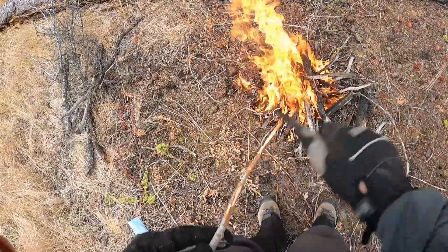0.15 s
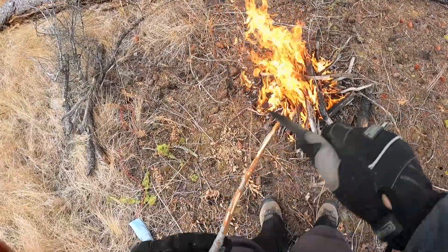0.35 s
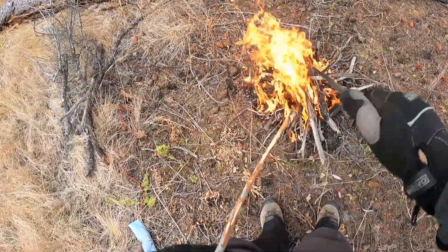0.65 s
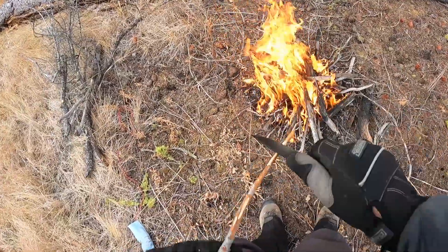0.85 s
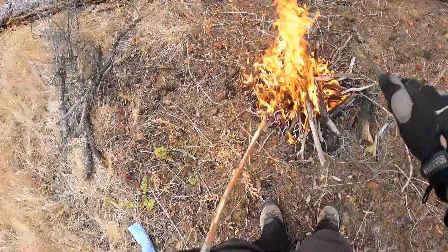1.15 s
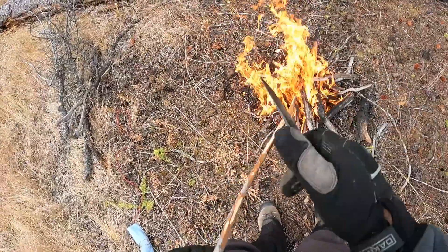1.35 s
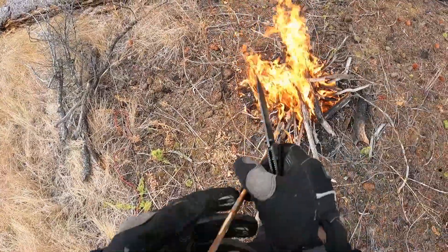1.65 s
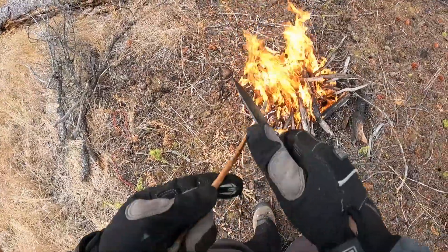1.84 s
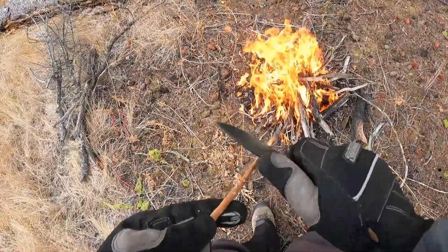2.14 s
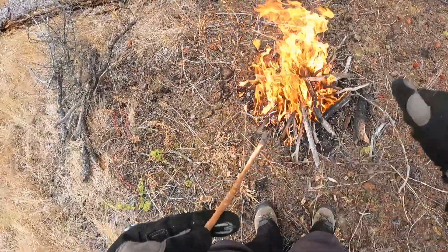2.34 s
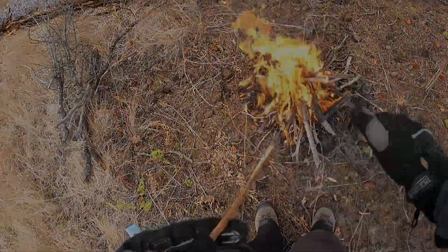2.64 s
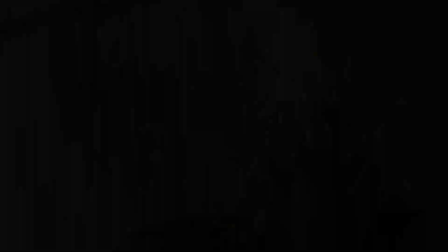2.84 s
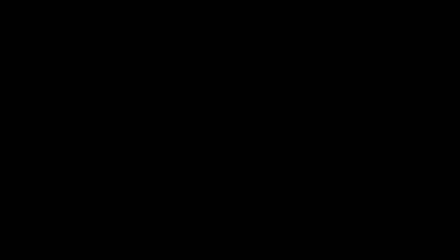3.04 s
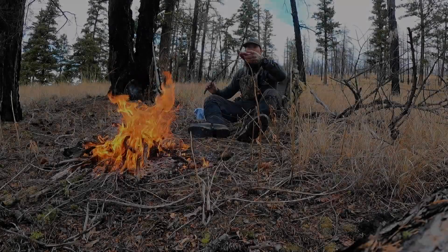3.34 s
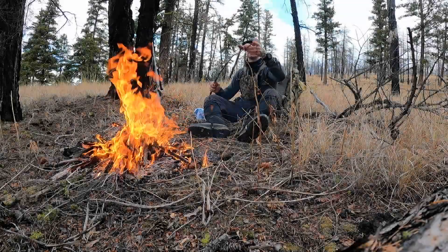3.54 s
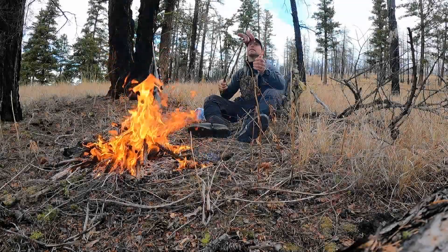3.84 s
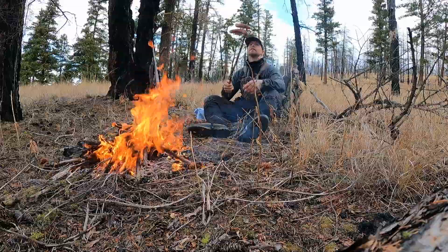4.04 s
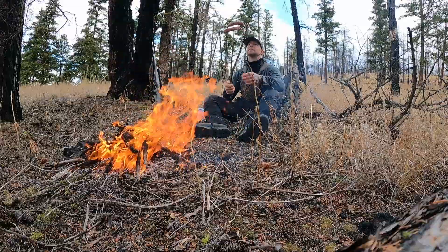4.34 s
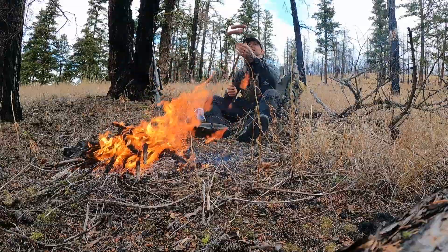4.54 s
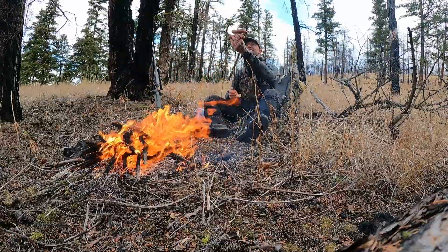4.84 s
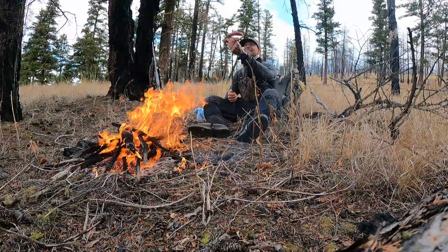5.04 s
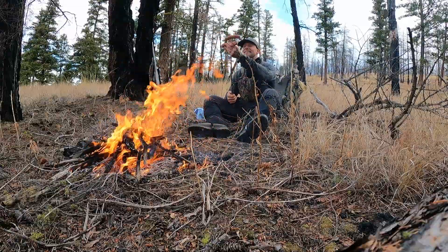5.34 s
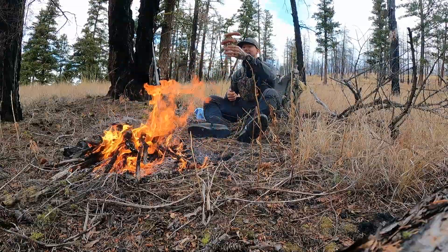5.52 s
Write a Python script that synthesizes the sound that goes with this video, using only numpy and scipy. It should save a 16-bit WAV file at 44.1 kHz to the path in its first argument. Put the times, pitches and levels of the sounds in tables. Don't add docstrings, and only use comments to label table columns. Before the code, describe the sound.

Outdoors, a small fire of dry twigs burns close below a small camera microphone. Sharp pops and bright snaps come many times a second, with short spurts of steamy sizzle and a deep uneven flame rumble. Around three seconds the view moves back: sizzle fades, pops become fewer and softer, and a low breeze rises near the end.

```python
import sys
import numpy as np
from scipy import signal
from scipy.fft import rfft, irfft, next_fast_len
from scipy.io import wavfile
from scipy.ndimage import uniform_filter1d

SR = 44100
rng = np.random.default_rng(int(sys.argv[2]) if len(sys.argv) > 2 else 0)


def digitize_waveform(pressure):
    field = np.atleast_2d(pressure).T
    bounded = np.clip(field, -1, 1)
    quanta = np.round(bounded * 32767).astype(np.int16)
    wavfile.write(sys.argv[1], SR, quanta)


def voltage_ratio(level):
    return 10 ** (np.asarray(level, float) / 20)


N = 250488


def resonances(hz, modes):
    total = 0
    for k, (mode_hz, width_hz, db) in enumerate(modes):
        damping = 1j * hz * width_hz
        total = total + (-1) ** k * voltage_ratio(db) * damping / (mode_hz ** 2 - hz ** 2 + damping)
    return total


def ring(x, modes):
    size = next_fast_len(len(x))
    hz = np.arange(size // 2 + 1) * SR / size
    y = irfft(rfft(x, size) * resonances(hz, modes), size)[:len(x)]
    return y / np.sqrt(np.mean(y ** 2))


def colour(x, points):
    size = next_fast_len(len(x))
    bins_hz = np.arange(size // 2 + 1) * SR / size
    hz, db = np.transpose(points)
    gain = voltage_ratio(np.interp(np.log(bins_hz + 1), np.log(hz), db))
    return irfft(rfft(x, size) * gain, size)[:len(x)]


def curves(table):
    seconds, *columns = np.transpose(table)
    return [np.interp(np.arange(N) / SR, seconds, column) for column in columns]


def walk(rate_hz):
    hold = int(SR / rate_hz)
    steps = np.repeat(rng.standard_normal(N // hold + 1), hold)
    return 1.56 * uniform_filter1d(uniform_filter1d(steps, hold), hold)[:N]


# frequency in Hz, level in dB.
AIR_TILT = [(300, 19), (700, -7.5), (1500, -9), (3000, -63), (6000, -9), (12000, -62), (16000, -38)]


def air():
    hush = colour(rng.standard_normal(N), [(100, -25), *AIR_TILT])
    return voltage_ratio(-63.5) * hush / hush.std()


# time in seconds, level in dB.
BREEZE_LEVEL = [
    (0, -94),
    (4.2, -97),
    (4.7, -66.5),
    (5.2, -55),
    (5.68, -53.5),
]


def breeze():
    level_db, = curves(BREEZE_LEVEL)
    gusts = level_db + 3.6 * walk(6)
    return voltage_ratio(gusts) * ring(rng.standard_normal(N), [(40, 24, 0)])


# time in seconds, rumble in dB, flutter in dB.
FLAME_LEVELS = [(0.0, -50.5, -43.5), (0.25, -41, -40.5), (0.33, -42, -46.5), (0.4, -29, -40.5),
                (0.44, -37.5, -43), (0.74, -39, -41), (0.79, -25.5, -39), (0.84, -36, -45), (0.9, -43, -32),
                (0.96, -32.5, -42), (1.03, -45, -39.5), (1.11, -26.5, -32.5), (1.14, -38.5, -36),
                (1.41, -44.5, -42.5), (1.9, -45, -42.5), (1.94, -39.5, -42.5), (2.06, -39.5, -44),
                (2.09, -33, -37.5), (2.18, -44, -54), (2.23, -46, -27), (2.31, -30, -44.5),
                (2.42, -43, -43), (2.59, -40, -47.5), (2.64, -39.5, -35.5), (2.7, -34, -47),
                (2.83, -57, -52), (2.93, -37.5, -36), (2.97, -41, -46), (3.26, -43, -47.5),
                (3.34, -41.5, -50), (3.39, -36, -42.5), (3.42, -40, -49.5), (3.54, -41.5, -44),
                (3.78, -46.5, -48.5), (3.81, -59, -39.5), (3.84, -44, -55.5), (3.99, -38, -46),
                (4.02, -43, -46.5), (4.14, -37, -52), (4.18, -29.5, -46.5), (4.29, -40.5, -56),
                (4.37, -41.5, -44.5), (4.78, -40.5, -52), (4.82, -35, -44), (4.97, -41.5, -42.5),
                (5.13, -31.5, -44), (5.14, -35, -44), (5.51, -37.5, -44), (5.54, -45, -45),
                (5.58, -27, -51), (5.68, -55, -46)]


def flame():
    rumble_db, flutter_db = curves(FLAME_LEVELS)
    rumble = ring(rng.standard_normal(N), [(33.5, 41.5, 2), (81, 82.7, -2)])
    puffs = ring(rng.standard_normal(N), [(231, 1170, 0)])
    flutter = ring(puffs, [(157, 86, 0.5), (345, 168, -4.5)])
    return voltage_ratio(rumble_db + 1) * rumble + voltage_ratio(flutter_db - 1.5 + 2.6 * walk(40)) * flutter


# frequency in Hz, width in Hz, level in dB.
HOUSING_MODES = [(1234, 346, -1), (1990, 416, -1.5), (2500, 395, -2), (3750, 800, 2), (4910, 2960, -4),
                 (6415, 2200, -3)]
# frequency in Hz, width in Hz, level in dB.
FIZZ_MODES = [(8060, 4500, -22.5), (10300, 780, 13.5), (13400, 1400, -23.5)]
# time in seconds, level in dB, fizz in dB.
SIZZLE_LEVELS = [(0.0, -44.5, -71), (0.14, -49, -68), (0.27, -47.5, -68), (0.38, -45.5, -53.5),
                 (0.74, -43, -49), (1.27, -47.5, -63), (1.44, -43.5, -58), (1.63, -43.5, -60),
                 (1.99, -45, -57), (2.53, -44.5, -59), (2.69, -46.5, -60), (2.94, -63, -71),
                 (3.11, -52, -57), (3.31, -55, -58), (3.57, -63, -78), (3.76, -62.5, -56.5),
                 (3.95, -67, -70), (4.21, -72.5, -75), (4.32, -60, -72), (4.81, -70, -86),
                 (5.54, -66.5, -83), (5.68, -67, -71)]
# start in seconds, length in seconds, level in dB,
# woody body minus level in dB, fizz minus level in dB.
STEAM_SPURTS = [(0.05, 0.035, -46.5, 4.5, -26), (0.177, 0.09, -24.5, -13, -41), (0.32, 0.017, -43, -9, -20),
                (0.369, 0.024, -31.5, -19.5, -32), (0.48, 0.036, -26, -12, -9),
                (0.563, 0.067, -31, -7.5, -34), (0.65, 0.0073, -48, -3, -15),
                (0.704, 0.01, -40.5, -0.5, -12), (0.872, 0.032, -34, -18, -25),
                (1.054, 0.075, -29, -12, -29), (1.164, 0.023, -30, -14, -30), (1.322, 0.02, -38.5, -7, -10),
                (1.41, 0.054, -31, -19, -22), (1.493, 0.026, -33, -19, -10), (1.617, 0.02, -35, -9, -20),
                (1.684, 0.02, -33, -12, -13), (1.758, 0.042, -34, -15, -18), (1.846, 0.0082, -28, -6, -18),
                (1.842, 0.044, -33.5, -11, -24), (1.961, 0.024, -31.5, -7, -13),
                (2.094, 0.032, -43, -20, -8), (2.149, 0.011, -43, -2, -3), (2.205, 0.07, -29, -7, -28),
                (2.354, 0.025, -42, -7, -11), (2.41, 0.023, -47, -4, -16), (2.462, 0.018, -29.5, -11, -18),
                (2.592, 0.061, -31, -18, -23), (2.785, 0.033, -55, 6, -18), (2.866, 0.1, -29, -2, -35),
                (2.993, 0.039, -41, -3, -17), (3.067, 0.029, -35.5, -10, -17),
                (3.178, 0.034, -38.5, 3.5, -26), (3.228, 0.056, -44, -2, -8), (3.306, 0.038, -53, -7, -10),
                (3.362, 0.025, -37, -6, -8), (3.531, 0.049, -38.5, -6, -2), (3.605, 0.071, -44, -6, -2),
                (3.707, 0.07, -49, -1, -11), (3.809, 0.048, -47.5, -3, -4), (3.888, 0.071, -44, -6, -11),
                (4.162, 0.086, -43, -2.5, -12), (4.447, 0.068, -49, 4, -16), (4.558, 0.053, -50, 7, -19),
                (4.722, 0.059, -46.5, 6, -2), (4.81, 0.087, -46, -1, -8), (5.07, 0.06, -56, 15, -10),
                (5.184, 0.025, -56, 11, -3), (5.598, 0.038, -55, 5, -1)]


def sizzle():
    level_db, fizz_db = curves(SIZZLE_LEVELS)
    mid, body, fizz = voltage_ratio(level_db - 1.0), voltage_ratio(level_db - 9), voltage_ratio(fizz_db - 16.5)
    t = np.arange(N) / SR
    for start, length, spurt_db, body_db, spurt_fizz_db in STEAM_SPURTS:
        near = slice(max(int((start - length) * SR), 0), int((start + 2 * length) * SR))
        from_middle = np.abs(2 * (t[near] - start) / length - 1)
        swell = voltage_ratio(spurt_db - 6.5) * np.exp(-from_middle ** 2.2)
        mid[near] += swell
        body[near] += voltage_ratio(body_db) * swell
        fizz[near] += voltage_ratio(spurt_fizz_db) * swell

    size_db = 3.0 * np.minimum(rng.exponential(size=N), 5)
    cracking = rng.random(N) < 0.04
    cracks = cracking * rng.standard_normal(N) * voltage_ratio(size_db)
    hiss = 0.75 * rng.standard_normal(N)
    steam = (cracks / cracks.std() + hiss) * voltage_ratio(4.13 * walk(110))
    woody = ring(steam, [(365, 89, -5), (830, 220, -9.5)])
    return mid * ring(steam, HOUSING_MODES) + fizz * ring(steam, FIZZ_MODES) + body * woody


# time in seconds, crack peak in dB, crack pitch in Hz,
# thud minus crack in dB, fizz minus crack in dB.
WOOD_POPS = [(0.0085, -14.5, 4610, -25, -10), (0.0377, -25, 2930, -17, -32), (0.0534, -27, 4050, -19, -22),
             (0.1422, -28, 2630, -21, -20), (0.1502, -22, 5000, -13, -15), (0.1731, -13.5, 4800, -19, -22),
             (0.1832, -23, 6160, -27, -18), (0.1928, -20, 1290, -3, -14), (0.202, -10, 3620, -30, -21),
             (0.235, -14, 1940, -4.5, -36), (0.3253, -24, 4970, -15, -20), (0.3336, -23.5, 4010, -25, -25),
             (0.3848, -4, 3670, -23, -26), (0.434, -25.5, 3440, -20, -19), (0.478, -19.5, 1120, -20, -6),
             (0.4995, -18.5, 4690, -22, -8), (0.521, -23.5, 3450, -14, -15), (0.6028, -21, 2630, -18, -23),
             (0.6585, -24.5, 4350, -10, -19), (0.7034, -20, 4910, -14, -21), (0.7555, -27, 4350, -21, -9),
             (0.8022, -29, 3630, -26, -28), (0.8489, -27, 3750, -19, -25), (0.877, -18, 2630, -13, -35),
             (0.892, -16, 2020, -5.5, -28), (0.909, -29, 2670, -22, -24), (0.947, -19.5, 3500, -26, -19),
             (0.9766, -21, 3300, -27, -32), (1.0677, -12.5, 2260, -11, -11), (1.1054, -22.5, 4500, -7, -16),
             (1.1723, -9.5, 4550, -33, -41), (1.2472, -32, 4520, -15, -14), (1.2656, -31, 2450, -18, -22),
             (1.3322, -23, 4650, -19, -13), (1.3868, -28.5, 1210, -19, -22),
             (1.4226, -16.5, 3330, -26, -25), (1.4367, -20, 3500, -24.5, -22),
             (1.4523, -9.5, 4700, -27, -21), (1.4856, -11, 3560, -31, -17), (1.5057, -29, 3450, -22, -8),
             (1.5344, -23, 3440, -13.5, -17), (1.561, -24.5, 1160, -25, -25), (1.5896, -23, 4610, -10, -14),
             (1.6337, -10, 3660, -20, -26), (1.7117, -23, 4520, -26, -18), (1.7363, -20, 4440, -21, -22),
             (1.764, -27, 3600, -15, -18), (1.7764, -17, 3900, -21, -24), (1.785, -16.5, 1250, -25, -25),
             (1.7997, -29, 4520, -22, -15), (1.8054, -25, 3450, -22, -25), (1.8558, -10, 3970, -20.5, -32),
             (1.8992, -14, 3770, -21, -29), (1.9362, -31, 3430, -24, -18), (1.976, -26, 1250, -17, -13),
             (2.0064, -26, 3250, -13, -13), (2.0699, -17, 8660, -28, -10), (2.0996, -24, 1250, -22, -15),
             (2.1154, -16.5, 3600, -28, -8), (2.1212, -29, 3700, -17, -10), (2.1538, -22, 3660, -26, -11),
             (2.2078, -22, 1200, -17, -4), (2.262, -11.5, 2580, -12, -29), (2.28, -24, 2580, -29, -26),
             (2.3647, -18.5, 1310, -21, -18), (2.4152, -22, 3800, -19, -26),
             (2.4624, -17.5, 6100, -25, -24), (2.5143, -23.5, 5100, -21, -25),
             (2.5626, -22, 4500, -16, -23), (2.6028, -5.5, 3700, -32, -22), (2.6258, -26.5, 3700, -24, -22),
             (2.633, -21, 6900, -7, -23), (2.6662, -19.5, 2800, -18, -32), (2.8023, -24.5, 3560, -22, -26),
             (2.873, -18, 5000, -25, -20), (2.8868, -25.5, 1290, -21, -18), (2.92, -18, 1890, -11, -29),
             (2.9265, -15, 1280, -16, -29), (2.9936, -29, 3750, -8, -18), (3.0172, -36, 1250, -15, -8),
             (3.068, -20.5, 3450, -16, -13), (3.0793, -25.5, 1340, -11, -9), (3.1595, -22, 3800, -21, -22),
             (3.1693, -29, 2370, -22, -23), (3.1904, -42, 1940, 6, -21), (3.2014, -28, 2330, -17, -21),
             (3.2409, -13, 5900, -13, -22), (3.307, -32.5, 2200, -2, -14), (3.3294, -31.5, 1680, -17, -18),
             (3.3706, -20.5, 3500, -9, -15), (3.4073, -46, 1550, -15, -19), (3.4452, -43, 4610, 2, -18),
             (3.4951, -40.5, 4870, -8, -12), (3.5471, -19.5, 5900, -6, -16), (3.6185, -32, 1540, 4, -8),
             (3.6522, -26, 1380, -2, 1), (3.718, -30, 1110, 2, -13), (3.745, -22, 7800, -7, -8),
             (3.8137, -12, 8300, -13, -5), (3.8766, -36, 3900, -3, -9), (3.9252, -29.5, 1420, 3.5, -25),
             (4.171, -29.5, 1120, 7.5, -5), (4.1815, -34, 1650, 11.5, -14), (4.3587, -34.5, 3340, -4, -18),
             (4.3835, -35.5, 1120, 5, -19), (4.4832, -25.5, 1120, 1, -20), (4.5746, -28, 1110, -5, -16),
             (4.714, -43, 1120, -7, -5), (4.7444, -18.5, 6200, -9, -4), (4.7538, -20, 9220, -12, -5),
             (4.815, -33, 3550, -13, -11), (4.849, -35, 1120, 3, -10), (4.8917, -35.5, 1120, -12, -18),
             (5.0679, -33, 1110, -1.5, -20), (5.0939, -32.5, 1120, -11, -15), (5.1248, -36, 1160, -8, -22),
             (5.1908, -21.5, 2140, -10, -9), (5.263, -34, 1590, -14, -14), (5.277, -33, 6400, -3, -18),
             (5.414, -31, 1200, -12, -4), (5.504, -46, 1210, -4, -15), (5.5384, -37.5, 1380, -14, -14),
             (5.565, -40, 1120, 4, -22.5), (5.5985, -15, 2130, -21, -20), (5.6486, -34, 1630, -10, -30),
             (5.6776, -9, 1510, -17, -30)]


def pops():
    tear_s, lead_s, tail_s = 0.00036, 0.005, 0.0081
    lead_db, tail_db, broad_db = -22, -20, -4
    span = 2048
    half = span // 2
    hz = np.arange(half + 1) * SR / span
    t = (np.arange(span) - half) / SR
    creak = voltage_ratio(lead_db) * np.exp(-abs(t / lead_s))
    scatter = voltage_ratio(tail_db) * np.exp(-abs(t / tail_s))
    shape = np.exp(-abs(t / tear_s)) + np.where(t < 0, creak, scatter)

    housing = voltage_ratio(broad_db) * resonances(hz, HOUSING_MODES)
    fizz = resonances(hz, FIZZ_MODES)
    thud = resonances(hz, [(570, 670, 0)]) ** 2
    out = np.zeros(N + span)
    for seconds, db, pitch_hz, thud_db, fizz_db in WOOD_POPS:
        tear = rfft(rng.standard_normal(span) * shape)
        crack = resonances(hz, [(pitch_hz, 0.45 * pitch_hz, 0)]) + housing
        at = int(seconds * SR)
        for response, part_db in [(crack, 0), (thud, thud_db - 1.5), (fizz, fizz_db)]:
            part = irfft(tear * response)
            out[at:at + span] += voltage_ratio(db + part_db) * part / np.abs(part).max()
    return out[half:][:N]


def scene():
    mid = air() + flame() + sizzle() + pops()
    gusts = breeze()
    return np.array([mid + gusts, mid - gusts])


# frequency in Hz, side minus mid in dB.
PORT_DIFFERENCE = [(1000, -39), (4000, -17.5), (9000, -13.5), (10500, -14.5), (11500, -2), (16000, -4.5)]


def port_difference(dry):
    side = colour(dry.mean(axis=0), PORT_DIFFERENCE)
    scatter = rng.standard_normal(64) * np.exp(-np.arange(64) / 16) / 3
    side = 0.49 * side + 0.76 * signal.fftconvolve(side, scatter)[:N]
    top = colour(side, [(10500, -80), (11200, 0)])
    open_frames = rng.random(N // 1024 + 1) < 0.45
    kept = uniform_filter1d(np.repeat(open_frames, 1024)[:N] * 1.0, 256)
    return top + kept * (side - top)


def roll_off(x):
    return signal.sosfilt(signal.butter(12, 16540, fs=SR, output="sos"), x)


def record(dry):
    low_pass = signal.cheby1(8, 1, 15150, fs=SR, output="sos")
    dry = signal.sosfilt(low_pass, dry)
    side = port_difference(dry)
    return roll_off(dry + np.array([-side, side]))


dry = scene()
out = record(dry)
digitize_waveform(out)
```